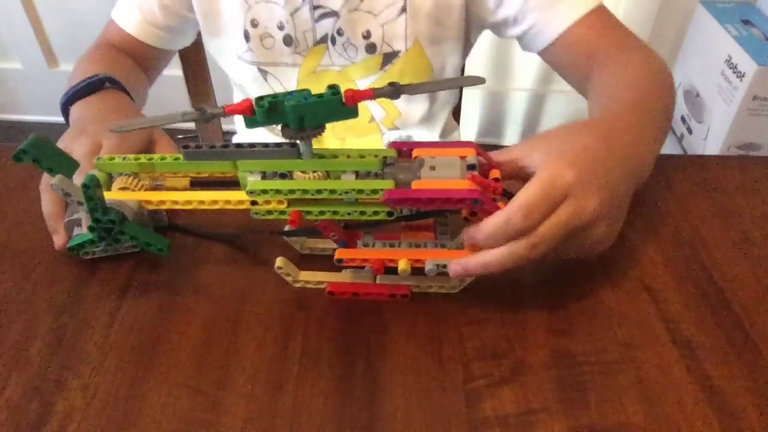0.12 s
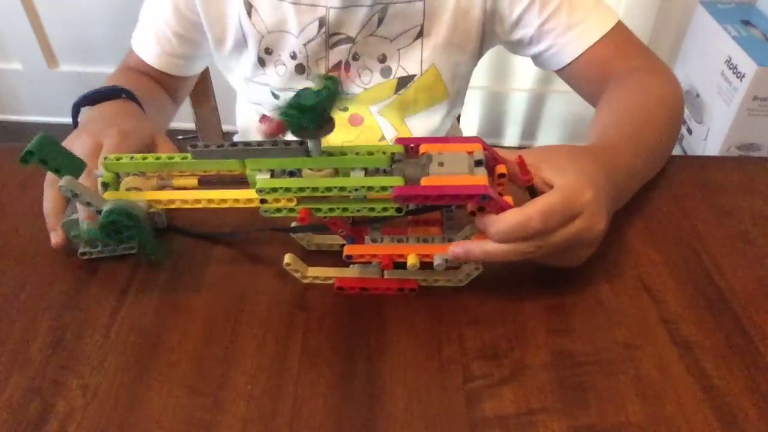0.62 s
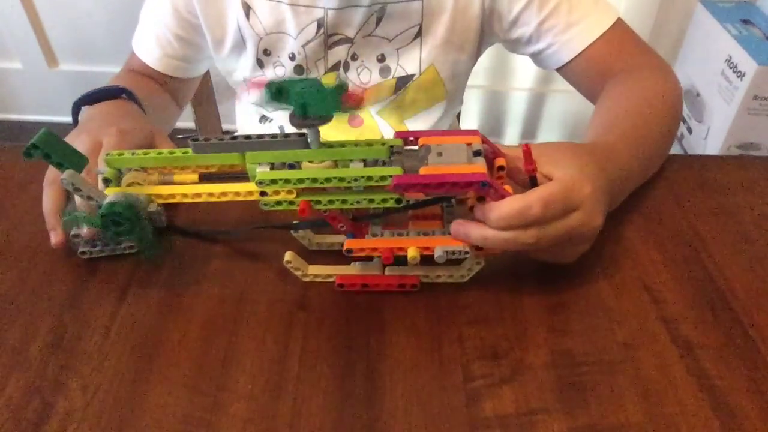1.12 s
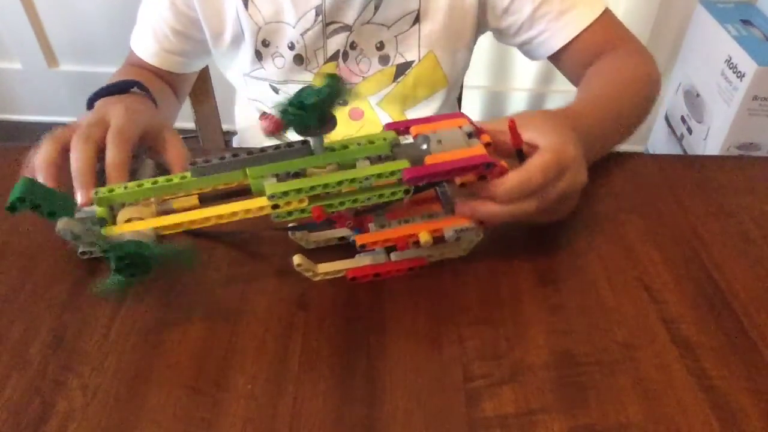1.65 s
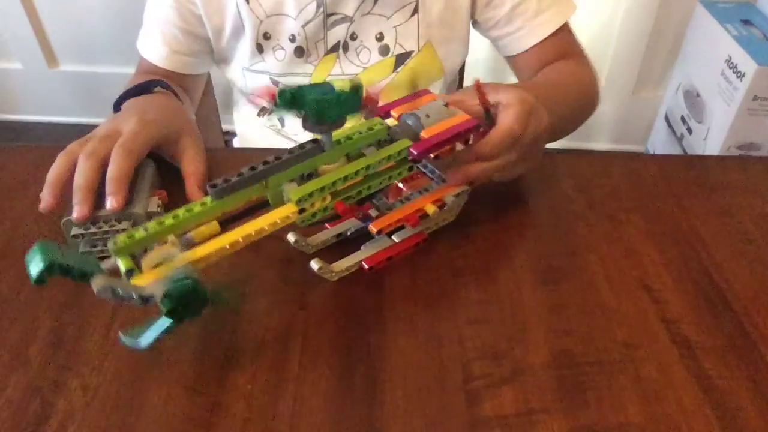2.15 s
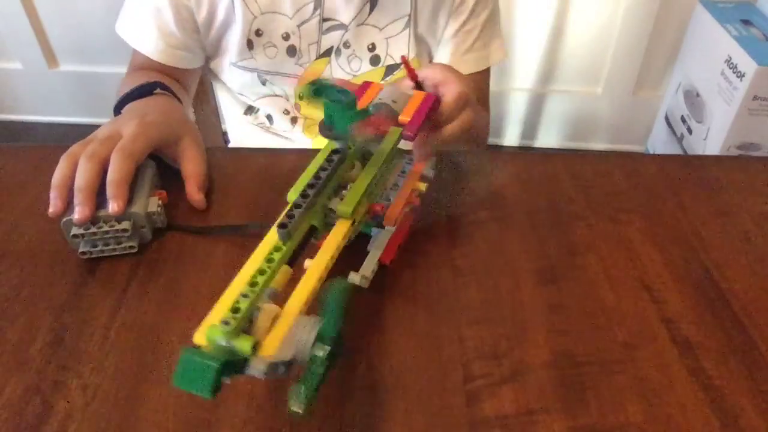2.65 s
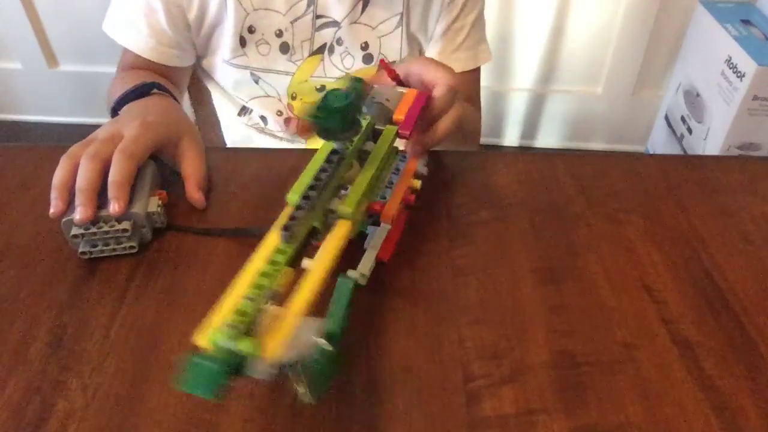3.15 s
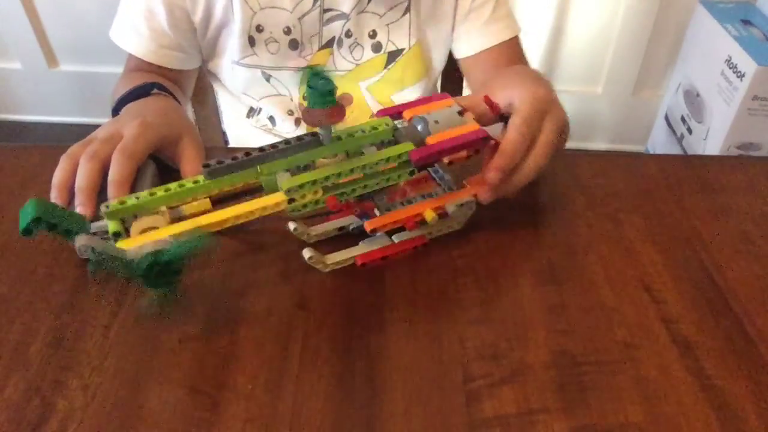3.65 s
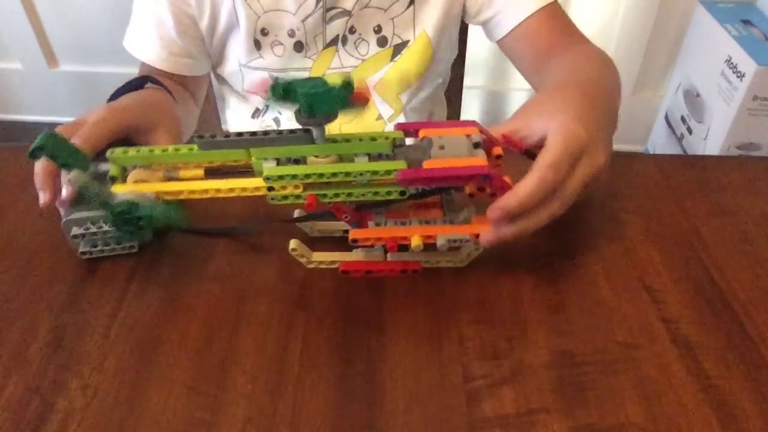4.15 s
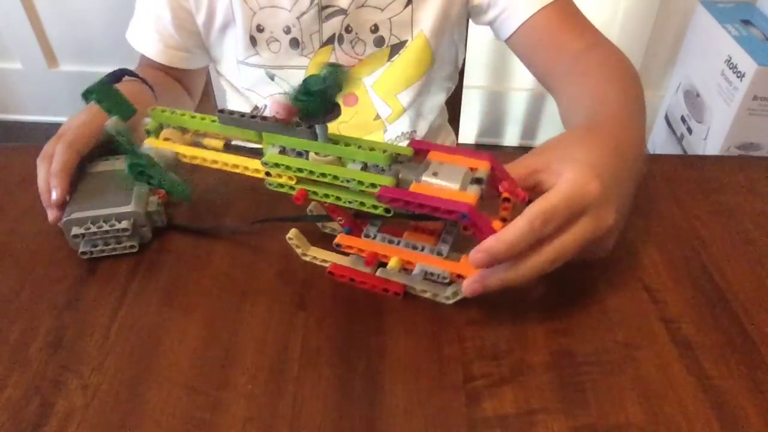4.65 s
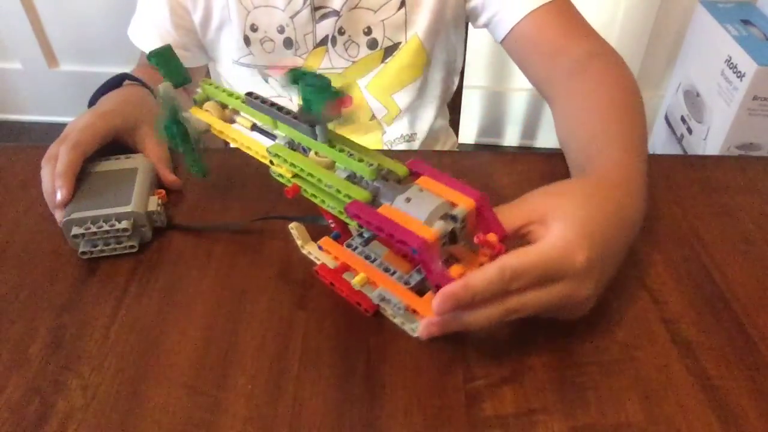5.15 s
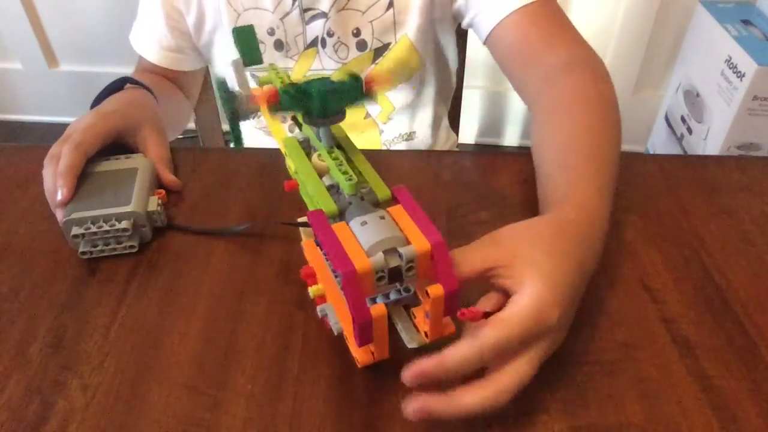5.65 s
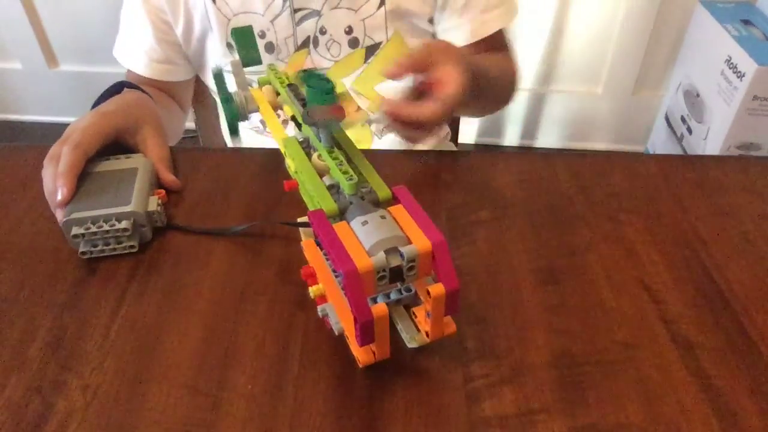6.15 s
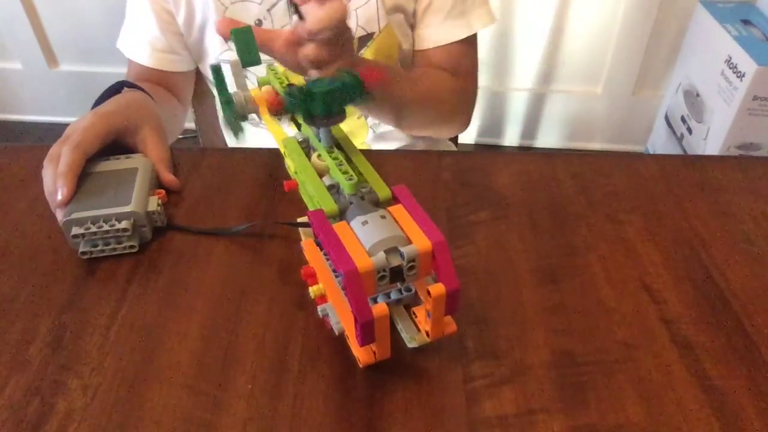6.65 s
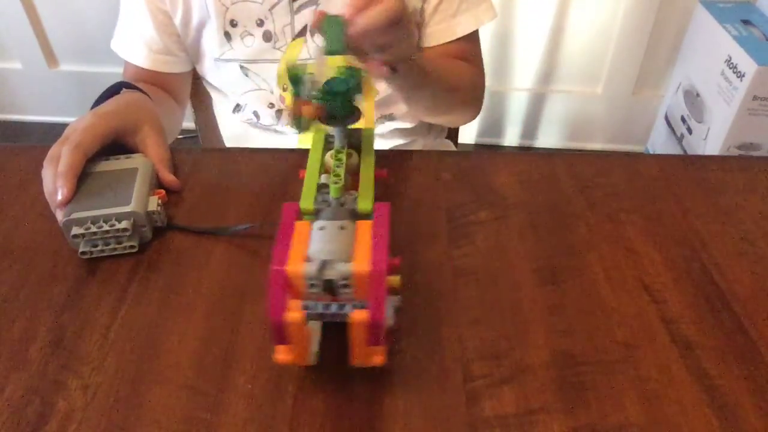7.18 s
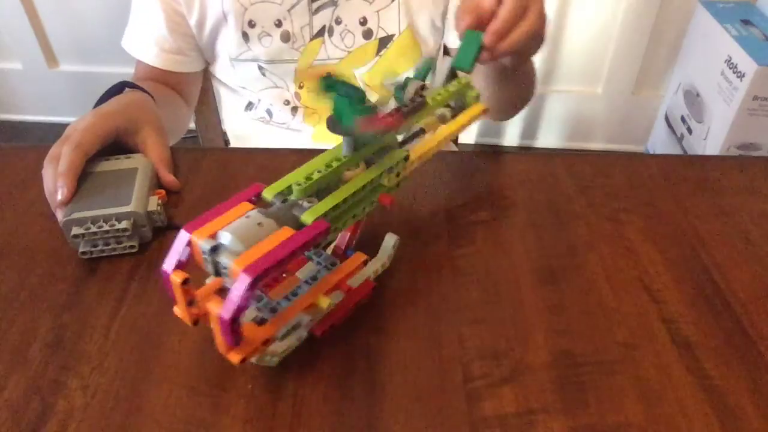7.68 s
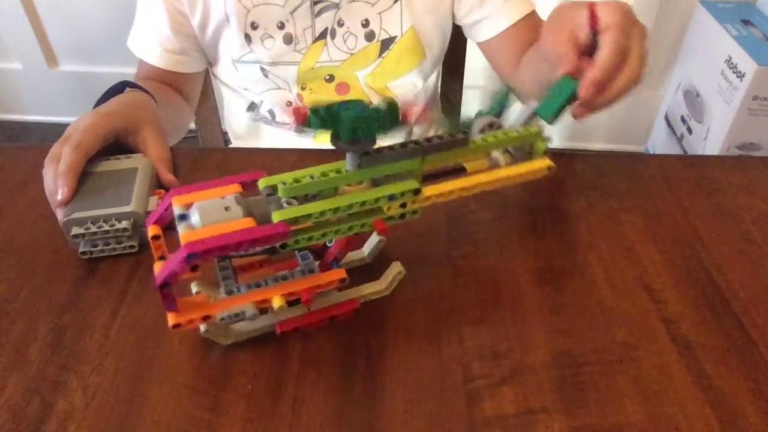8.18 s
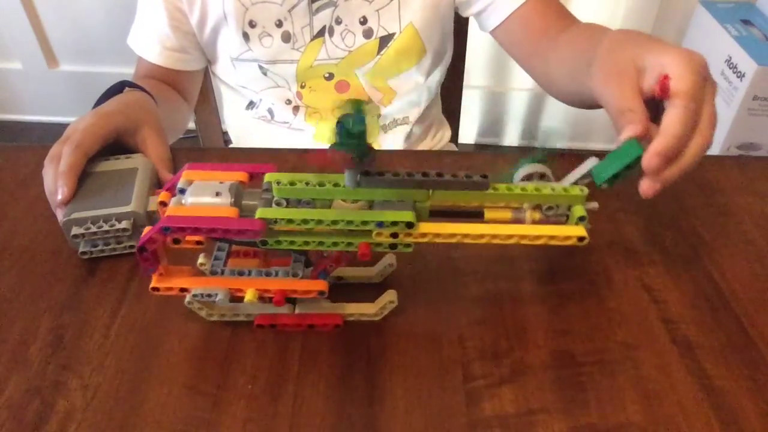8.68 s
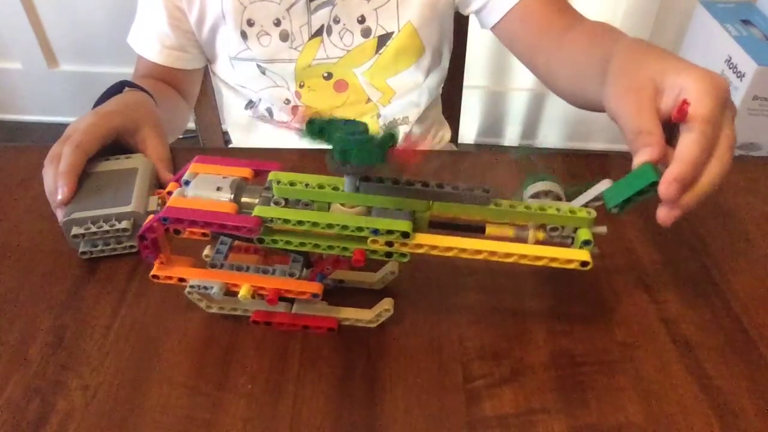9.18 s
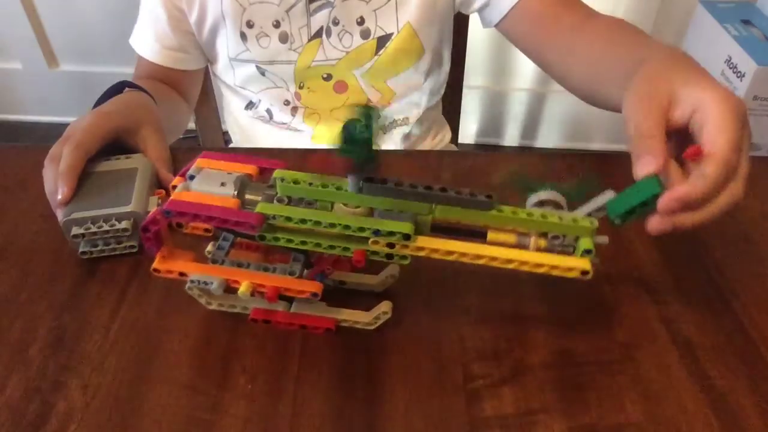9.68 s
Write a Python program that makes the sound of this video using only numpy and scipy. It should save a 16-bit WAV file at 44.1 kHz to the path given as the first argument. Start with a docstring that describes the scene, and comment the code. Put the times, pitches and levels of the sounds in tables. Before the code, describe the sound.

A switch snaps, plastic knocks, and a small toy motor whirs up with buzzing, whining gear clatter, loud at first, then duller and much quieter.

```python
"""Over a quiet room and a wavering mains hum, a switch snaps and the toy model bumps on a wooden table.
A small motor spins up with a plastic knock: sines whine and sing at multiples of its shaft speed, while
noise clatter that largely repeats every turn rings the frame. As a hand turns the model, its parts face the
microphone in turn, resonant skids scrape the table top and loose parts rattle; later a loose pin ticks."""
import sys
import numpy as np
from scipy import signal
from scipy.fft import rfft, irfft
from scipy.io import wavfile
from scipy.ndimage import uniform_filter1d, map_coordinates

SR = 44100
rng = np.random.default_rng(int(sys.argv[2]) if len(sys.argv) > 2 else 0)


def nominal_scale(level):
    """Amplitude ratio for a level in decibels (scalar or array-like)."""
    x = np.asarray(level, float) / 20
    return 10 ** x


def digitize_waveform(pressure):
    """Quantize a signal to 16-bit integers and store it at the path in sys.argv[1].

    Rows of a 2-D input are taken as channels; values are limited to [-1, 1].
    """
    field = np.atleast_2d(pressure).T
    bounded = np.clip(field, -1, 1)
    quanta = np.round(bounded * 32767).astype(np.int16)
    wavfile.write(sys.argv[1], SR, quanta)


N = 432621
TIME = np.arange(N) / SR
START_S = 0.222  # the drive reaches its level

# the model in the hand, level of the drive as heard: t/s, heading/deg, level/dB
MODEL_IN_HAND = [(.3, -2.5, -41), (.7, 2, -41), (1.5, 1, -41), (2, 27, -42.5), (2.3, 33.5, -43),
                 (2.6, 63.5, -45), (3, 67, -49.5), (3.25, 49, -51.5), (3.4, 35, -48.5), (4, 6, -50.5),
                 (4.35, -0.5, -52.5), (5, -53, -57), (5.4, -70.5, -58), (5.9, -70, -56.5),
                 (6.9, -86.5, -59), (7.2, -97, -56.5), (7.5, -115, -57), (8, -145, -56), (8.6, -175, -56.5),
                 (9.2, -180, -57.5), (9.8, -180, -59.5)]


def unit(x):
    """Scale to rms 1."""
    return x / np.sqrt(np.mean(x ** 2))


def curves(table):
    """Columns of a table as values per sample."""
    s, *columns = np.transpose(table)
    return [np.interp(TIME, s, c) for c in columns]


def colour(x, points):
    """Shape a spectrum along (Hz, dB) points."""
    hz, db = np.transpose(points)
    bins = np.maximum(np.arange(N // 2 + 1) * SR / N, 1)
    gain_db = np.interp(np.log(bins), np.log(hz), db)
    return irfft(rfft(x) * nominal_scale(gain_db), N)


def band(x, low_hz, high_hz):
    """Steep band-pass."""
    return signal.sosfilt(signal.butter(4, [low_hz, high_hz], "bandpass", fs=SR, output="sos"), x)


def resonance(x, hz, width):
    """The same resonance twice in a row, gain 1 at its centre."""
    b, a = signal.iirpeak(hz, hz / width, SR)
    return signal.lfilter(b, a, signal.lfilter(b, a, x))


def walk(rate):
    """Random levels held 1 / rate s and slewed twice; spread near 1."""
    k = int(SR / rate)
    held = np.repeat(rng.standard_normal(N // k + 1), k)
    return 1.25 * uniform_filter1d(uniform_filter1d(held, k), k)[:N]


def grains(spread):
    """Dense clicks of uneven size."""
    size_db = spread * np.minimum(rng.exponential(size=N), 4)
    return unit(rng.standard_normal(N) * nominal_scale(size_db))


def gate(start, end, attack, release):
    """Rises from start, holds, falls after end."""
    return np.clip((TIME - start) / attack, 0, 1) * np.exp(-np.maximum(TIME - end, 0) / release)


def swell(start, end):
    """Fades in after start and out before end."""
    return np.clip(np.minimum(TIME - start, end - TIME) / 0.2, 0, 1)


def blows(events, modes, crack_db, tail_db, tail_t60):
    """Each blow cracks, rings the same modes a little differently and leaves a short room tail."""
    out, t = np.zeros(N + SR), TIME[:SR // 3]
    for s, db in events:
        ring = 0
        for hz, mode_db, t60 in modes:
            strength = nominal_scale(mode_db + 1.5 * rng.standard_normal())
            ring = ring + strength * np.sin(2 * np.pi * hz * t) * nominal_scale(-60 * t / t60)
        ring = ring * np.clip(t / .0012, 0, 1)  # soft onset
        ring = ring + rng.standard_normal(len(t)) * nominal_scale(crack_db - 60 * t / 0.0088)
        echo = rng.standard_normal(len(t)) * nominal_scale(tail_db - 60 * t / tail_t60)
        # a gentle low-pass dulls the tail
        tail = signal.lfilter([.5], [1, -.5], signal.fftconvolve(ring, echo)[:len(t)])
        out[int(s * SR):][:len(t)] += nominal_scale(db) * (ring + tail) / np.abs(ring).max()
    return out[:N]


def room():
    """Low room murmur: steady noise with a shaped spectrum."""
    # murmur spectrum, relative: f/Hz, density/dB per Hz
    murmur_spectrum = [(30, -40), (50, -10), (80, -4.5), (130, -5.5), (300, 2.5), (450, -6), (600, -18),
                       (2000, -19), (6000, -41), (8000, -45)]
    return nominal_scale(-63.5) * unit(colour(rng.standard_normal(N), murmur_spectrum))


def hum():
    """Mains hum: one 120 Hz sine whose level wavers."""
    return np.sqrt(2) * nominal_scale(-69.5 + 3.0 * walk(18)) * np.sin(2 * np.pi * 120 * TIME)


def switch():
    """The switch lever snaps and bounces, and a click comes as the motor starts, all ringing short damped
    modes."""
    # lever and bounces, then a click as the motor starts: t/s, peak before the tail/dB
    snaps = [(0.0632, -19.5), (0.0785, -37), (0.084, -23.5), (0.1934, -37)]
    # ringing of the switch: f/Hz, relative level/dB, t60/s
    switch_modes = [(2760, -3, 0.013), (2950, -11.5, 0.013), (4500, -4, 0.0053), (5360, -0.5, .005),
                    (6260, 1, 0.005), (6850, 5.5, 0.0047), (8300, -2, 0.0027)]
    return blows(snaps, switch_modes, crack_db=-19.5, tail_db=-33.5, tail_t60=0.26)


def bumps():
    """Dull bumps ring the low modes of the table top."""
    # bumps: t/s, peak before the tail/dB
    bump_events = [(0.139, -43), (0.217, -28.5), (0.989, -39), (1.47, -34.5)]
    # ringing of the table top: f/Hz, relative level/dB, t60/s
    bump_modes = [(122.4, -5, 0.32), (191, 8, 0.024), (325, -13, 0.063), (870, 4, 0.038)]
    return blows(bump_events, bump_modes, crack_db=-35, tail_db=-65, tail_t60=.2)


def patterns_per_s():
    """Paths to the microphone drift by themselves and change faster while the model turns."""
    heading = curves(MODEL_IN_HAND)[0]
    degrees_per_s = uniform_filter1d(np.abs(np.gradient(heading)) * SR, size=8820)
    return 1.102 + degrees_per_s / 9  # a new pattern every 9 degrees


def radiated(lobes):
    """Level dB of each row towards the microphone as the model turns: a front lobe and a cross."""
    heading, level_db = curves(MODEL_IN_HAND)
    level_db = level_db - 43 * np.clip((START_S - TIME) / 0.066, 0, 1)  # rise at the start
    return [level_db + db + front * np.cos(np.radians(heading - a)) + cross * np.cos(2 * np.radians(heading - b))
            for db, front, a, cross, b in lobes]


def facing(x, width_hz, depth_db, full_hz):
    """Paths from the many parts add and cancel, most in the treble; the pattern changes as the model turns."""
    hz, s, spectra = signal.stft(x, SR, nperseg=1024)
    angle = np.cumsum(np.interp(s, TIME, patterns_per_s())) * (s[1] - s[0])
    field = rng.standard_normal((200, 100))
    places = np.meshgrid(hz / width_hz, angle, indexing="ij")
    pattern = map_coordinates(field, places, order=3)
    gain_db = depth_db * pattern * np.minimum(hz / full_hz, 1)[:, None]
    return signal.istft(spectra * nominal_scale(gain_db), SR)[1][:N]


def shaft():
    """Turns of the shaft: it speeds up towards the running speed that the load allows, with slight wander."""
    # running speed before lag and wander: t/s, speed/Hz
    running_speed = [(0.47, 135.59), (0.54, 134.95), (0.74, 135.47), (0.89, 136.94), (1.05, 137.43),
                     (1.21, 138.93), (1.41, 139.55), (1.5, 138.96), (1.58, 139.07), (1.72, 137.7),
                     (1.77, 137.7), (1.9, 137.8), (1.98, 138.83), (2.21, 137.88), (2.4, 138.6),
                     (2.49, 137.97), (2.72, 138.65), (2.92, 138.31), (3.21, 139.14), (3.35, 138.9),
                     (3.61, 140.2), (3.67, 139.71), (3.84, 140.01), (3.96, 139.5), (4.07, 140.32),
                     (4.22, 140.7), (5.34, 139.6), (5.86, 140.25), (5.93, 139.12), (6.07, 139.59),
                     (6.54, 138.41), (7.15, 138.25), (7.88, 139.89), (8.26, 139.71), (8.32, 140.3),
                     (8.47, 139.76), (8.73, 141.05), (8.8, 140.15), (9.56, 141.19), (9.79, 140.39)]
    lag_hz = 17 * np.exp(-(TIME - START_S) / .11)
    speed = curves(running_speed)[0] - lag_hz
    return np.cumsum(speed * (1 + .0005 * walk(14))) / SR


def teeth(turns, memory, spread):
    """Clicks laid out round the shaft; each turn repeats most of the last one."""
    slots = 320  # clicks per turn
    fresh = np.resize(grains(spread), (int(turns[-1]) + 2, slots))
    pattern = signal.lfilter([1], [1, -memory], fresh, axis=0).ravel()
    return map_coordinates(pattern, [turns * slots], order=3)


def motor():
    """One shaft drives the whine, the singing gears and the tooth contact that rings frame and case."""
    # share of the clatter that repeats each turn, against the loose part: f/Hz, level/dB
    repeating = [(600, -6.5), (1200, -3.5), (4000, -9.5), (6000, -11), (10000, 2.5), (15000, -14)]
    # radiation of each frame part: level/dB, front lobe/dB, its heading/deg, cross/dB, its heading/deg
    part_lobes = [(-1, 2.6, 143, 2.1, 99), (1.5, 1.5, 142, 0.11, -41), (-8.5, 1.6, -149, 2.4, -39),
                  (0.5, 3, -68, 0.96, 48), (-1, 3, -78, 3.8, 0), (-0.5, 4, 80, 1.6, -71),
                  (-1.5, 3.2, -150, 2.7, -56)]
    turns = shaft()
    part_db = radiated(part_lobes)
    flutter_db = 0.22 * patterns_per_s()  # more flutter while the paths change
    mesh = unit(teeth(turns, memory=.93, spread=3.0))
    contact = colour(mesh, repeating) + grains(spread=4.1)
    return (rattle(part_db[1]) + frame_parts(contact, turns, part_db, flutter_db)
            + whine(turns) + singing_gears(turns) + rings(contact, mesh, flutter_db))


def rattle(level_db):
    """Loose pins tick against the beams as noise bursts, more often while the model turns."""
    ticks_per_s = 3.9 * patterns_per_s()
    struck = rng.random(N) < ticks_per_s / SR
    ticks = struck * nominal_scale(3.5 * rng.standard_normal(N))
    t = TIME[:SR // 20]
    burst = rng.standard_normal(len(t)) * nominal_scale(-60 * t / 0.21)
    return band(signal.fftconvolve(ticks, burst)[:N], 1590, 4050) * nominal_scale(level_db + 3.5)


def frame_parts(contact, turns, part_db, flutter_db):
    """Tooth contact rings the frame, long beams to small gears, each part in a band with its own level."""
    # ringing of the frame, relative: f/Hz, density/dB per Hz
    frame_spectrum = [(500, -36), (700, -14.5), (1000, -5), (1300, -4.5), (1900, 0), (2500, 0.5),
                      (3000, -12), (4100, -11.5), (4700, -11), (5800, -4), (7500, -13), (8900, -11.5),
                      (11000, -4.5), (13400, -12), (15500, -5)]
    # edges of the ranges in which the parts ring: f/Hz
    part_edges = (600, 1500, 2900, 4600, 6500, 8200, 12200, 15700)
    # the teeth bite harder at these multiples of the shaft speed: order
    bite_orders = (1, 3, 4)
    # swing of the bite, one for each order: depth/dB
    bite_depths = (0.5, 3.5, 0)
    # how much of the bite each part feels: factor
    bite_shares = (0.99, 0.92, 0.24, 0.65, 0.38, 0.12, .2)
    bite_db = sum(db * np.cos(2 * np.pi * k * turns) for k, db in zip(bite_orders, bite_depths))
    clatter = facing(colour(contact, frame_spectrum), width_hz=320, depth_db=2.6, full_hz=4500)
    # the gears take up their slack, felt in the long beams
    jolt_db = 2 * np.exp(-np.abs(TIME - START_S) / 0.049)
    # the top part dulls further as the drive sinks
    drive_db = curves(MODEL_IN_HAND)[1]
    dulling_db = 0.57 * (drive_db - drive_db.max())
    parts = 0
    for low, high, db, share in zip(part_edges, part_edges[1:], part_db, bite_shares):
        level_db = db + jolt_db * (high < 3000) + 0.61 * walk(6) + flutter_db * walk(22)
        if high == part_edges[-1]:
            level_db = level_db + dulling_db
        parts = parts + unit(band(clatter, low, high) * nominal_scale(share * bite_db)) * nominal_scale(level_db)
    return parts * np.clip((TIME - .18) / 0.025, 0, 1)


def scrape():
    """Skids judder over the wood: uneven noise rings the resonances of the table top."""
    # resonances of the table top: f/Hz, width of each pass/Hz, relative level/dB
    table_top = [(93.5, 91, 5), (308, 260, 8.5), (444.6, 48, 6.5)]
    # skids slide on the table: start/s, length/s, level/dB
    slides = [(0.194, 0.05, -40), (0.282, 0.16, -48), (1.436, 0.026, -50), (2.052, 0.078, -50.5),
              (2.383, 0.35, -50.5), (2.774, 0.042, -44.5), (2.86, 0.324, -57.5), (3.49, 0.16, -50.5),
              (3.903, 0.093, -59.5), (4.418, 0.031, -58), (4.741, 0.14, -49), (5.026, 0.042, -50.5),
              (5.519, 0.044, -55), (5.83, 0.6, -64.5), (6.935, 0.062, -58), (7.162, 0.081, -57.5),
              (7.557, 0.22, -53.5), (7.8, 0.74, -56), (8.642, 0.22, -57.5), (8.897, 0.52, -65),
              (9.202, 0.059, -58)]
    rub = grains(spread=3.0) * nominal_scale(1.9 * walk(40))
    ringing = sum(nominal_scale(db) * resonance(rub, hz, width) for hz, width, db in table_top)
    sliding = sum(nominal_scale(db) * gate(s, s + length, attack=0.01, release=0.021) for s, length, db in slides)
    return unit(band(ringing, 50, 530)) * sliding


def whine(turns):
    """Sines at low multiples of the shaft speed, each with its own radiation lobes."""
    # multiples of the shaft speed that whine: order
    whine_orders = (3, 7, 9, 12, 13, 4, 5, 6, 11)
    # radiation of each multiple: level/dB, front lobe/dB, its heading/deg, cross/dB, its heading/deg
    whine_lobes = [(-16.5, 3, 160, 5, -61), (-15, 3, 168, 4, 20), (-10.5, 4.5, 44, 2.5, 33),
                   (-23.5, 16.5, 83, -3.5, 76), (-9.5, 6.5, -153, 6.5, -56), (-40, 5, 0, 8.5, -18),
                   (-25, -1, 3, 3, -24), (-19.5, 10, 152, 5, 53), (-28, 10, -170, 7, 18)]
    # skids pressed down, so that the lowest multiple hums in the table top: from/s, to/s, extra level/dB
    pressed = [(.6, 1.755, 0), (2.366, 3.164, 13), (4.094, 4.495, 8.5), (4.9, 5.048, 3.5)]
    whine_db = radiated(whine_lobes)
    whine_db[0] = whine_db[0] + sum(db * gate(start, end, 0.014, 0.014) for start, end, db in pressed)
    tones = sum(np.sqrt(2) * nominal_scale(db + 1.6 * walk(25)) * np.sin(2 * np.pi * k * turns)
                for k, db in zip(whine_orders, whine_db))
    return tones * np.clip((TIME - .2) / 0.12, 0, 1)


def singing_gears(turns):
    """Sines at further shaft multiples, mostly high, swell while their gear faces the microphone."""
    # multiples of the shaft speed, one for each row of singing: order
    sing_orders = (39, 42, 43, 49, 52, 54, 56, 57, 61, 72, 86, 74, 78, 80, 81, 83, 75, 83, 90, 52, 42, 48,
                   83, 10, 13, 12)
    # when each multiple sings: from/s, to/s, level/dB
    singing = [(.35, 2.4, -52.5), (.3, 2.45, -40), (.4, 2.45, -44.5), (1.6, 2.4, -47), (1, 2.6, -51),
               (1, 2.7, -51), (.6, 2.5, -52), (.6, 2.5, -52), (.3, 2.3, -52), (.6, 2.5, -53),
               (.5, 3.4, -54), (1, 3.8, -53), (1.3, 3.1, -52), (1.7, 3.8, -48), (1.8, 3.8, -51),
               (2.1, 2.7, -48), (2.3, 3.5, -52), (3, 3.8, -52), (2.2, 3.3, -56), (3.1, 3.9, -57),
               (4.7, 7.3, -65), (7, 9.9, -67), (7.8, 9.9, -71), (7, 8.7, -66), (.35, 2.7, -56),
               (.2, 2.9, -51)]
    total = 0
    for k, (start, end, db) in zip(sing_orders, singing):
        tone = np.sin(2 * np.pi * (k * turns + rng.random()))
        total = total + np.sqrt(2) * nominal_scale(db + 2.1 * walk(20)) * tone * swell(start, end)
    return total


def rings(contact, mesh, flutter_db):
    """Tooth contact excites strong resonances of case and gears while they point at the microphone."""
    # rings before the facing pattern: from/s, to/s, f/Hz, width of each pass/Hz, level/dB
    ring_events = [(.2, 2.45, 5900, 600, -45), (0.298, 2, 9700, 400, -49.5), (1.2, 2.66, 7220, 500, -48),
                   (1.44, 2.4, 9950, 200, -47), (1.6, 2.9, 10950, 450, -46), (2.1, 3.2, 5000, 450, -53),
                   (2.55, 3.16, 12500, 600, -47), (2.5, 3.6, 10330, 350, -46.5),
                   (3.122, 3.6, 7240, 350, -45.5), (3.15, 3.62, 11300, 500, -46),
                   (3.55, 3.95, 5450, 500, -50), (3.85, 4.7, 2550, 500, -57), (3.85, 4.45, 6140, 396, -50),
                   (4.15, 4.5, 7600, 250, -46), (4.45, 5, 11700, 500, -60), (4.75, 5.4, 1822, 40, -58),
                   (5.45, 6.3, 13600, 900, -62), (6.9, 7.5, 14400, 1300, -60), (7.15, 7.58, 7400, 300, -61),
                   (7.25, 9.9, 3490, 400, -63.5), (8.4, 9.9, 2490, 70, -68)]
    total = 0
    for start, end, hz, width, db in ring_events:
        ring = unit(resonance(contact + 0.035 * mesh, hz, width))
        total = total + ring * nominal_scale(db + (0.2 + flutter_db) * walk(24)) * swell(start, end)
    return facing(total, width_hz=200, depth_db=5.0, full_hz=4960)


def rumble():
    """The drive rumbles in the table top: low noise that follows the level of the drive."""
    level_db = curves(MODEL_IN_HAND)[1] - 23.5
    return unit(band(rng.standard_normal(N), 57, 162)) * nominal_scale(level_db) * (TIME > START_S)


def knocks():
    """Plastic knocks ring damped modes of the frame."""
    # knocks: t/s, peak before the tail/dB
    knock_events = [(0.227, -2), (3.639, -28)]
    # ringing of the frame: f/Hz, relative level/dB, t60/s
    knock_modes = [(1090, 3, 0.012), (1486, -2, 0.019), (2430, -1.5, 0.0094), (2970, 2.5, 0.0057),
                   (5800, 7.5, 0.0039), (6930, 6.5, 0.0047)]
    return blows(knock_events, knock_modes, crack_db=-3.5, tail_db=-36, tail_t60=0.22)


def pin_ticks():
    """A loose pin ticks with three close damped modes."""
    # ticks: t/s, peak before the tail/dB
    tick_events = [(3.3313, -37.5), (3.5927, -39), (7.6909, -42), (8.1786, -44), (8.3827, -42),
                   (8.5465, -44), (8.707, -45)]
    # ringing of the pin: f/Hz, relative level/dB, t60/s
    tick_modes = [(3060, 4, 0.024), (2840, 7, 0.035), (3500, 6.5, 0.021)]
    return blows(tick_events, tick_modes, crack_db=-30, tail_db=-25, tail_t60=0.2)


def scene():
    """All sources at one microphone."""
    background = room() + hum()
    handling = switch() + bumps() + scrape() + knocks() + pin_ticks()
    return (background + handling + motor() + rumble())[None]


def top_cut(x):
    """Nothing passes above the cut-off."""
    return signal.sosfilt(signal.butter(12, 16990, fs=SR, output="sos"), x)


def record(dry):
    """The recorder cuts the top steeply above 15750 Hz."""
    cut = signal.sosfilt(signal.ellip(8, .2, 40, 15750, fs=SR, output="sos"), dry)
    return top_cut(cut)


dry = scene()
out = record(dry)
digitize_waveform(out)
```